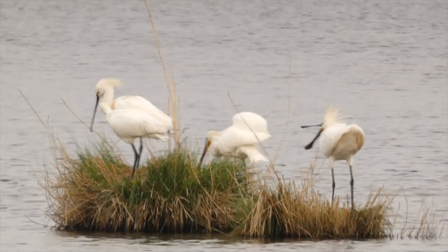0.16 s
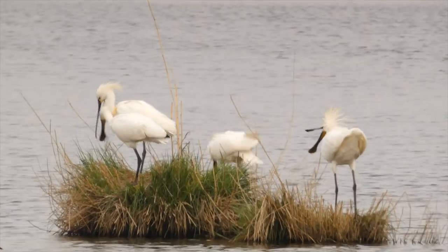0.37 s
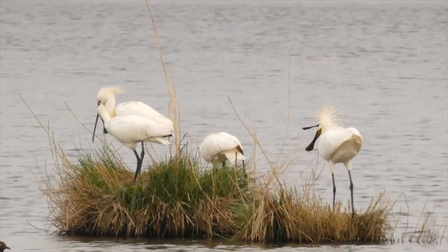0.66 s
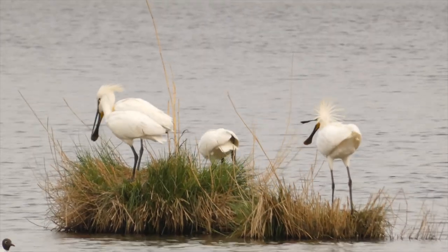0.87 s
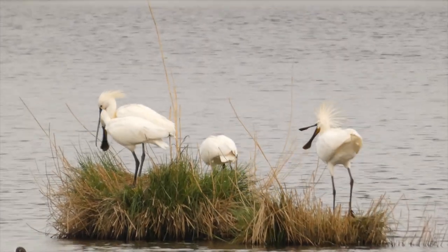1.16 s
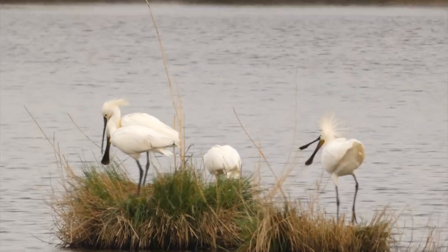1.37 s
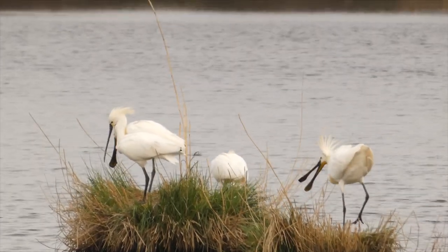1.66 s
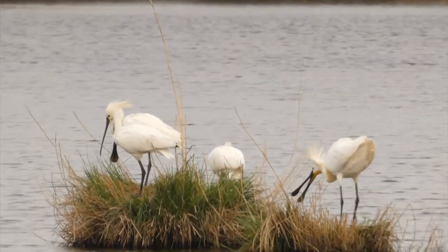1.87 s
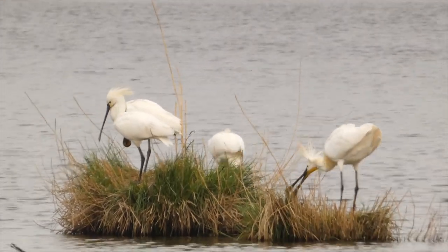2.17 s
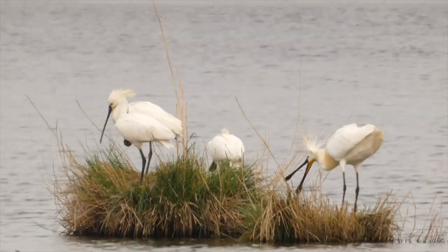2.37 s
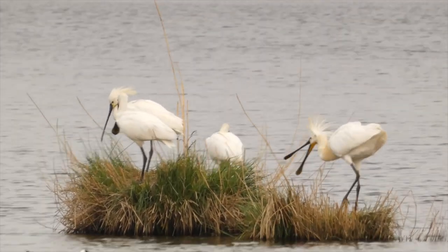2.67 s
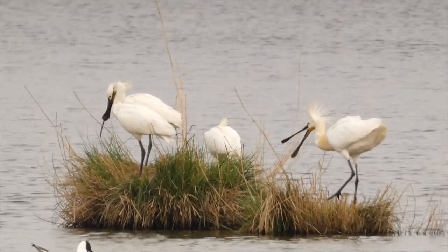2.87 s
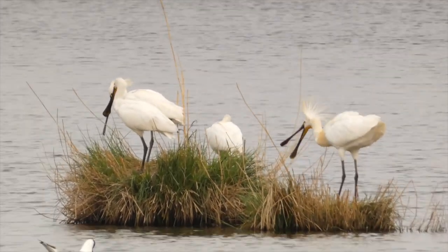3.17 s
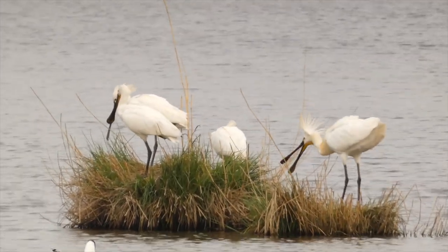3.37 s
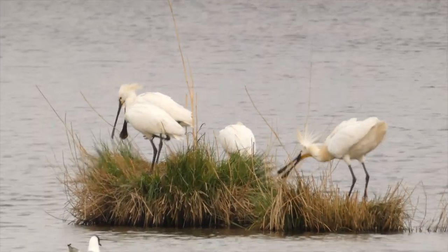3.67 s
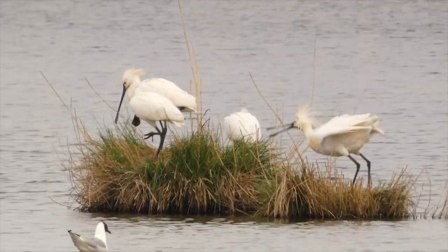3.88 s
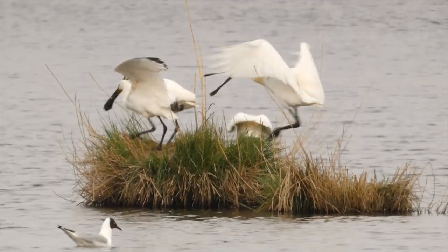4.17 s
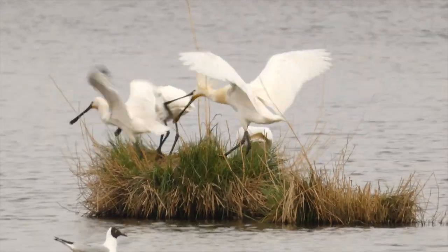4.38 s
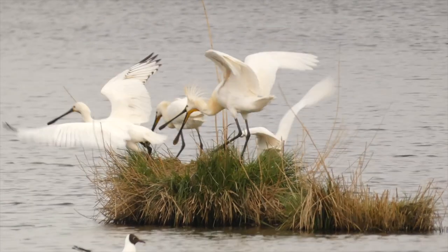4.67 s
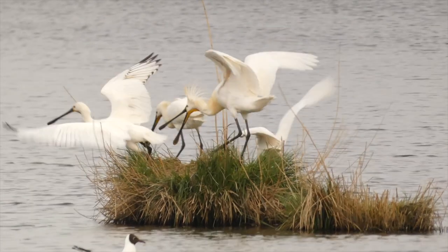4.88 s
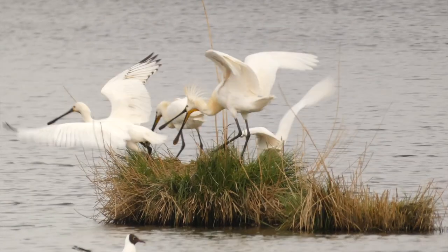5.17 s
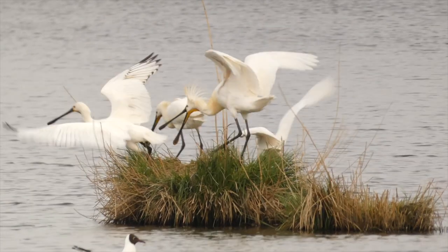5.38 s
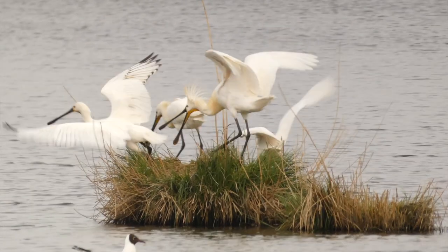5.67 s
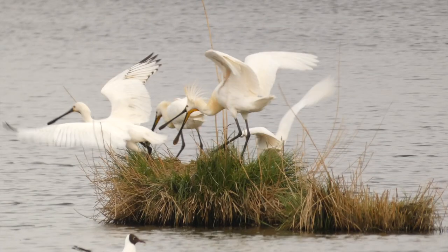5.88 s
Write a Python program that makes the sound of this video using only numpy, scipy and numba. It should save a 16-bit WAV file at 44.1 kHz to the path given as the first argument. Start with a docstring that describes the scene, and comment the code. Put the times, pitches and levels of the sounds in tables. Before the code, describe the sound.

Hoarse gull screams, squawks and sinking wails overlap outdoors by the water, with many more gulls chattering farther off. Wind bumps the nearly mono microphone in a few low thumps, mostly near the start. Later some birds trill, and a few very faint knocks and a tick come as the distant chorus eases. A faint low hum and hiss lie underneath.

```python
"""Gulls call across a pond: near birds rasp, yelp, wail and trill over the dense chorus of the colony.
Each voice is a reedy tone near 900 Hz, chopped into bursts and coloured by the throat.
Wind thumps now and then on an almost mono microphone, over a faint low hum and hiss.
The banks return a thin echo, and a few soft knocks and a tick come in the second half."""
import sys
import numpy as np
from scipy import signal
from scipy.fft import rfft, irfft, next_fast_len
from scipy.io import wavfile
from numba import njit

SR = 44100
rng = np.random.default_rng(int(sys.argv[2]) if len(sys.argv) > 2 else 0)


def file_out(sig):
    """Save sig as 16-bit WAV at sys.argv[1]."""
    # one column per channel
    cols = np.atleast_2d(sig).T
    # limit, then scale
    lim = np.clip(cols, -1, 1)
    pcm = np.round(lim * 32767).astype(np.int16)
    wavfile.write(sys.argv[1], SR, pcm)


N = 265482
CALL_T = np.arange(int(SR * .75)) / SR  # time within one call, t/s


def undb(db):
    """Decibels to gain."""
    return 10 ** (np.asarray(db) / 20)


def unit(x):
    """Scale to an rms of one."""
    return x / np.sqrt(np.mean(x ** 2) + 1e-20)


def curves(table):
    """Automation lanes: each column after the first, joined by straight lines in time."""
    times, *columns = np.transpose(table)
    return [np.interp(np.arange(N) / SR, times, column) for column in columns]


def colour(x, points):
    """EQ by a curve of f/Hz, level/dB; rms one."""
    hz, db = np.transpose(points)
    size = next_fast_len(x.shape[-1])
    bins_hz = np.maximum(np.arange(size // 2 + 1) * SR / size, 1)
    gain = undb(np.interp(np.log(bins_hz), np.log(hz), db))
    return unit(irfft(rfft(x, size) * gain, size)[..., :x.shape[-1]])


def waver(rate, t=CALL_T):
    """A random drift with rate turning points a second."""
    steps = rng.standard_normal(4096)
    return np.interp(t * rate, np.arange(len(steps)), steps)


def narrow_noise(size, side_db):
    """Noise that is nearly the same left and right."""
    mid, side = rng.standard_normal((2, size))
    return mid + undb(side_db) * side * np.array([[1], [-1]])


@njit
def swept_bandpass(x, hz, width_hz):
    """State-variable band-pass with a moving centre."""
    out, band_state, low_state = np.empty(len(x)), 0., 0.
    for i in range(len(x)):
        tuning, damping = np.tan(np.pi * hz[i] / SR), width_hz / hz[i]
        band = (band_state + tuning * (x[i] - low_state)) / (1 + tuning * (tuning + damping))
        band_state = 2 * band - band_state
        low_state += 2 * tuning * band
        out[i] = damping * band
    return out


def resonance(x, hz, width_hz):
    """Two band-passes in a row make a resonance with steep skirts; rms one."""
    hz, width_hz = hz * np.ones(len(x)), float(width_hz)
    return unit(swept_bandpass(swept_bandpass(x, hz, width_hz), hz, width_hz))


def add(out, start, x):
    """Mix a sound in at its start time."""
    offset = int(start * SR)
    first, last = max(offset, 0), min(offset + len(x), N)
    if last > first:
        out[first:last] += x[first - offset:last - offset]


def gesture(length, top_hz, end_hz, crest, edge_s):
    """Progress, pitch and loudness of a call: the pitch arches over a crest, the voice swells and stops."""
    progress = np.clip(CALL_T / length, 0, 1)
    pitch = top_hz + (end_hz - top_hz) * ((progress - crest) / (1 - crest)) ** 2
    fade = np.clip(np.minimum(CALL_T, length - CALL_T) / edge_s, 0, 1)
    return progress, pitch, np.sin(np.pi / 2 * fade)


def syrinx(pitch, burst_hz, jitter, hiss, bend, harmonics=13):
    """A reedy, jittering tone and the flutter that chops it; the pitch lifts within each burst."""
    cycle = rng.random() + np.cumsum(burst_hz * (1 + .021 * waver(58.6))) / SR
    flutter = np.sin(np.pi * cycle) ** 2
    phase = np.cumsum(pitch * (1 + jitter * waver(1200) + bend * (flutter - .75))) / SR
    angle = np.pi * (phase % 1) + 1e-9
    tone = np.sin((2 * harmonics + 1) * angle) / np.sin(angle) - 1  # a sum of equal harmonics
    return unit(tone) + hiss * rng.standard_normal(len(CALL_T)), flutter


def bursts(flutter, depth, uneven_db):
    """Loudness of the bursts, no two alike."""
    return unit((1 - depth + depth * flutter) * undb(uneven_db * waver(89.15)))


def burst_rate(pitch, top_hz):
    """Higher voices rattle faster, and the rattle slows as the pitch sinks."""
    usual_burst_hz, usual_pitch_hz, slowing = 86, 928.6, 1.74
    return usual_burst_hz * top_hz / usual_pitch_hz * (pitch / top_hz) ** slowing


def flock(count=90):
    """Many far birds, each with its own pitch, pace and hoarseness, merge into a chorus."""
    # their throats and the long way over the water: f/Hz, level/dB
    far_tone = [(400, -37), (700, -28), (1000, -11.5), (1250, 0), (1520, 8.5), (1850, 2.5), (2200, -0.5),
                (2600, -12), (3200, -13.5), (4200, -11.5), (4800, -17.5), (6000, -28), (7200, -42),
                (9500, -46.5), (14000, -62.5)]
    # swells and lulls: t/s, body level/dB, shrill edge level/dB
    swells = [(0.0, -46.5, -48), (0.35, -46, -47), (0.55, -47.5, -52), (0.8, -46.5, -47),
              (0.85, -50, -54.5), (0.98, -47.5, -49), (1.5, -45.5, -49), (1.8, -43.5, -47),
              (2.15, -44, -46.5), (2.4, -47, -49), (2.92, -48.5, -49), (3.28, -44.5, -48),
              (3.56, -51.5, -60), (3.63, -49, -47), (3.76, -49.5, -49), (4.43, -52.5, -48),
              (4.54, -56.5, -65.5), (4.63, -64, -60), (4.7, -55, -51), (4.77, -61.5, -55),
              (4.85, -55, -51.5), (5.6, -52.5, -52.5), (5.85, -52, -47), (6.02, -50.5, -50.5)]
    chorus = np.zeros(N)
    for k, (when, long, high, pace, hoarse, far) in enumerate(rng.random((count, 6))):
        top_hz = 800 + 300 * high
        progress, pitch, swell = gesture(.25 + .4 * long, top_hz, top_hz * .88, crest=.33, edge_s=.045)
        burst_hz = (70 + 25 * pace) * (1 - .18 * progress)
        source, flutter = syrinx(pitch, burst_hz, jitter=.05 + .04 * hoarse, hiss=.6, bend=.08)
        start = (k + when) / count * (N / SR + .5) - .5
        add(chorus, start, undb(-4 * far) * swell * bursts(flutter, depth=.65, uneven_db=1.5) * source)
    chorus = colour(chorus, far_tone)
    body = signal.sosfiltfilt(signal.butter(4, 2400, fs=SR, output="sos"), chorus)
    body_db, shrill_db = curves(swells)
    return undb(body_db) * unit(body) + undb(shrill_db) * unit(chorus - body)


def rasps():
    """Harsh falling screams: a strong second harmonic, and an upper resonance that sinks with the pitch."""
    # screams: start/s, end/s, top pitch/Hz, level/dB, then the upper resonance's f/Hz, width/Hz, level/dB
    screams = [ (-0.25, 0.423, 900.6, -52.5, 3730, 1310, -55.5), (0.223, 0.6, 907, -54, 6300, 2100, -64.5),
               (0.541, 0.839, 985, -50.5, 4560, 1010, -59.5), (0.887, 1.353, 885, -50, 4400, 1090, -55),
               (1.075, 1.51, 971, -50.5, 3920, 960, -55), (1.522, 2, 983, -45, 4380, 1010, -58.5),
               (1.529, 2.218, 878, -52, 4000, 950, -55.5), (1.956, 2.399, 985, -49.5, 4300, 990, -54.5),
               (2.39, 2.863, 836.6, -52, 5830, 500, -62), (2.438, 2.945, 928, -55, 3480, 840, -53),
               (2.929, 3.343, 920, -55, 3950, 960, -55.5), (2.918, 3.208, 912, -72, 7800, 1900, -73.5),
               (3.131, 3.356, 828, -49, 3640, 700, -62), (3.33, 3.593, 887, -54.5, 3570, 705, -63),
               (3.6, 4.231, 924, -52, 4110, 1060, -55), (4.04, 4.246, 895, -58, 3020, 800, -48.5),
               (4.279, 4.478, 887, -63, 2980, 900, -55), (4.542, 4.772, 977, -57.5, 4730, 970, -54.5),
               (4.793, 5.109, 945, -60, 4600, 805, -61), (4.899, 5.524, 961, -63, 2500, 580, -54.5),
               (5.449, 5.76, 939, -59.5, 3370, 810, -52), (5.73, 6.094, 933, -49.5, 3300, 890, -48)]
    # the throat's overtone envelope: f/Hz, level/dB
    throat = [(500, -6.5), (1000, 3), (1400, -20), (2000, 12.5), (2700, 9), (3600, -2), (4700, -28),
              (6000, -51), (7200, -10), (8600, -2), (10500, -34), (14000, -37)]
    sag_hz_per_s = 170  # a longer scream sinks further
    out = np.zeros(N)
    for start, end, top_hz, db, upper_hz, upper_width_hz, upper_db in screams:
        length = end - start
        _, pitch, swell = gesture(length, top_hz, top_hz - sag_hz_per_s * length, crest=.25, edge_s=.039)
        source, flutter = syrinx(pitch, burst_rate(pitch, top_hz), jitter=.03, hiss=.35, bend=.04)
        body = resonance(source, 2 * pitch, width_hz=720)
        hoarse = source + undb(2.5) * rng.standard_normal(len(CALL_T))  # harmonics break into air
        # the upper resonance chirps up and down within each burst and weakens between them
        chirp = 1 + .09 * (flutter - .75)
        upper = resonance(hoarse, upper_hz * chirp * pitch / top_hz, upper_width_hz)
        upper *= bursts(flutter, depth=.17, uneven_db=1)
        overtones = undb(-14.5) * colour(hoarse, throat)
        voice = undb(db) * (body + overtones) + undb(upper_db) * upper
        add(out, start, swell * bursts(flutter, depth=.69, uneven_db=2.5) * voice)
    return out


def yelps():
    """Short notes with one strong harmonic; a wide-open, rough throat turns them into squawks."""
    # notes: start/s, end/s, pitch/Hz, level/dB, throat f/Hz, throat width/Hz, jitter/share of pitch
    notes = [ (-0.04, 0.102, 756, -50, 1460, 200, 0.1), (0.461, 0.53, 866, -49.5, 3490, 199, 0.1),
             (0.54, 0.656, 857, -50, 3430, 200, 0.03), (0.688, 0.72, 980, -53, 4000, 300, 0.02),
             (0.684, 0.73, 830, -46.5, 3280, 400, 0.13), (1.107, 1.274, 737, -49.5, 1510, 200, 0.05),
             (1.165, 1.207, 1027, -40.5, 2050, 200, 0.12), (1.351, 1.438, 849, -46, 1710, 200, 0.02),
             (1.42, 1.485, 935, -43, 1880, 200, 0.09), (1.79, 1.888, 992, -47, 3030, 600, 0.06),
             (1.796, 1.83, 877, -52, 3560, 400, 0), (2.727, 2.804, 978, -48, 2930, 450, 0.06),
             (2.771, 2.827, 768, -53, 2360, 400, 0.02), (4.652, 4.72, 1024, -61, 3080, 200, 0.02),
             (4.96, 5.073, 945, -52, 1890, 250, 0.18), (5.028, 5.062, 850, -50, 2500, 300, 0.1),
             (5.113, 5.15, 845, -60, 2550, 300, 0.04), (5.211, 5.336, 727, -53.5, 1430, 200, 0),
             (5.281, 5.309, 985, -49, 2960, 250, 0), (5.495, 5.53, 1030, -56, 4140, 200, 0.07)]
    out = np.zeros(N)
    for start, end, top_hz, db, throat_hz, throat_width_hz, jitter in notes:
        _, pitch, swell = gesture(end - start, top_hz, top_hz * .975, crest=.491, edge_s=.013)
        source, flutter = syrinx(pitch, burst_hz=99.9, jitter=jitter, hiss=.1, bend=.019)
        voice = undb(db) * resonance(source, throat_hz, throat_width_hz)
        add(out, start, swell * bursts(flutter, depth=.42, uneven_db=2.5) * voice)
    return out


def wails():
    """Purring tones that sink from the first moment, clear in the second harmonic and hoarser above it."""
    # cries: start/s, end/s, first pitch/Hz, last pitch/Hz, jitter/share of pitch, harmonics 2-4 level/dB
    cries = [ (0.0, 0.235, 921, 887, 0.02, -52, -57, -49), (0.12, 0.421, 818, 795, 0.04, -49, -62, -64),
             (0.28, 0.562, 960, 824, 0.03, -48, -61, -57), (0.578, 0.858, 869, 857, 0.01, -48.5, -67, -58),
             (0.926, 1.205, 912, 861, 0.08, -44.5, -70, -52.5), (0.96, 1.1, 805, 781, 0.06, -45, -56, -62),
             (1.037, 1.222, 1185, 1040, 0.05, -51, -55, -54),
             (1.216, 1.421, 1161, 991, 0.02, -51, -53, -58), (1.218, 1.501, 981, 847, 0.13, -46, -58, -63),
             (1.559, 1.928, 1160, 1126, .03, -52, -68, -61), (1.683, 1.991, 956, 920, 0.01, -55, -59, -55),
             (1.777, 1.941, 840, 751, 0.08, -49, -65, -57), (2.021, 2.215, 808, 754, 0.07, -48, -63, -66),
             (2.214, 2.571, 975, 792, 0.06, -43, -57.5, -60),
             (2.579, 2.782, 850, 779, 0.08, -45.5, -64, -64),
             (2.97, 3.176, 1145, 1124, 0.02, -50, -51, -57),
             (3.056, 3.265, 925, 869, 0.03, -42.5, -66, -59),
             (3.358, 3.582, 935, 832, 0.03, -50, -71, -58.5), (3.63, 3.99, 1178, 1145, 0.02, -53, -59, -69),
             (4.422, 4.584, 881, 820, 0.06, -53.5, -63, -68), (5.71, 5.999, 949, 923, 0.03, -49, -52, -62)]
    out = np.zeros(N)
    for start, end, top_hz, end_hz, jitter, second_db, third_db, fourth_db in cries:
        progress, _, swell = gesture(end - start, top_hz, end_hz, crest=0, edge_s=.05)
        pitch = top_hz + (end_hz - top_hz) * progress ** 1.5
        source, flutter = syrinx(pitch, burst_rate(pitch, top_hz), jitter, hiss=.3, bend=.025)
        voice = (undb(second_db) * resonance(source, 2 * pitch, width_hz=290)
                 + undb(third_db) * resonance(source, 3 * pitch, width_hz=700)
                 + undb(fourth_db) * resonance(source, 4 * pitch, width_hz=960))
        add(out, start, swell * bursts(flutter, depth=.72, uneven_db=1.5) * voice)
    return out


def bank_echo(birds, t60_s, db):
    """A thin, diffuse echo from the reeds and banks."""
    tail = narrow_noise(len(CALL_T), side_db=-58) * undb(-60 * CALL_T / t60_s)
    tail /= np.sqrt(np.sum(tail[0] ** 2))
    return undb(db) * signal.fftconvolve(birds[None], tail)[:, :N]


def open_air():
    """A wavering bed of air with a low hum in it."""
    # still air, its hum near 400 Hz: f/Hz, level/dB
    air_tone = [(30, -39), (120, -32), (300, -18), (360, -0.5), (405, 10), (470, -4.5), (650, -9.5),
                (1000, -11.5), (3000, -4), (9000, -45), (14000, -36)]
    # fader ride of the air: t/s, level/dB
    air_ride = [(0.0, -63), (0.82, -68.5), (1.05, -75), (1.45, -64.5), (3.2, -63.5), (3.65, -62.5),
                (4.48, -62), (4.6, -70), (4.95, -73), (5.9, -63)]
    (air_db,) = curves(air_ride)
    waver_db = 2 * waver(11, np.arange(N) / SR)
    return undb(air_db + waver_db) * colour(narrow_noise(N, side_db=-36), air_tone)


def wide_hiss():
    """A faint, steady hiss, independent in each ear."""
    # f/Hz, level/dB
    tone = [(40, 5), (130, -2), (400, 14), (1500, 4.5), (5000, -14.5), (9000, 2.5), (14000, -7)]
    return undb(-78.5) * colour(rng.standard_normal((2, N)), tone)


def wind():
    """Eddies buffet the microphone: each builds up and collapses, over a light breeze."""
    # the breeze between the thumps: t/s, rumble level/dB
    breeze = [(0.0, -79.5), (0.65, -76.5), (1.05, -65), (1.6, -72), (2.6, -74.5), (3.3, -79.5), (4.1, -80),
              (5.0, -85), (6.02, -94)]
    # thumps: peak t/s, length/s, rumble level/dB, flutter level/dB
    gusts = [ (0.72, 0.026, -43, -62), (0.779, 0.022, -41, -53), (0.823, 0.046, -38.5, -39),
             (0.88, 0.043, -56, -46), (0.95, 0.086, -51, -56), (1.105, 0.044, -42.5, -73),
             (1.153, 0.045, -50, -58), (1.192, 0.018, -43, -57), (1.23, 0.028, -40.5, -37.5),
             (1.285, 0.023, -47.5, -67), (2.023, 0.057, -63, -85), (2.2, 0.091, -59.5, -87),
             (2.363, 0.099, -55, -69), (2.424, 0.036, -45, -54), (2.693, 0.077, -61, -77),
             (2.797, 0.1, -50, -56), (2.876, 0.078, -53, -45), (3.607, 0.085, -76, -70),
             (3.77, 0.047, -58, -56.5), (4.495, 0.057, -55.5, -62.5), (4.536, 0.09, -64, -56.5),
             (4.698, 0.16, -82, -59.5), (4.923, 0.01, -66, -59), (5.166, 0.086, -66, -65),
             (5.368, 0.11, -78, -60.5), (5.546, 0.054, -88, -66.5)]
    # the deep rumble of an eddy: f/Hz, level/dB
    rumble_tone = [(25, -38), (50, -20), (80, -2.5), (120, 1.5), (160, -2.5), (220, -25.5), (500, -71)]
    # the flutter above it: f/Hz, level/dB
    flutter_tone = [(70, -34), (125, -5), (180, 3), (230, -4), (310, -15.5), (500, -34.5), (800, -42),
                    (2000, -76)]
    rise, fall = .37, .48  # time constants, as shares of a thump's length
    t = np.arange(N) / SR
    (breeze_db,) = curves(breeze)
    rumble_gain, flutter_gain = undb(breeze_db), undb(breeze_db - 3.5)
    for peak_s, length, rumble_db, flutter_db in gusts:
        push = np.exp(-np.maximum((peak_s - t) / rise, (t - peak_s) / fall) / length)
        rumble_gain = np.hypot(rumble_gain, undb(rumble_db) * push)
        flutter_gain = np.hypot(flutter_gain, undb(flutter_db) * push)
    rumble = rumble_gain * colour(narrow_noise(N, side_db=-26), rumble_tone)
    flutter = flutter_gain * colour(narrow_noise(N, side_db=-25.5), flutter_tone)
    # the microphone does not follow the slowest swings
    return signal.sosfilt(signal.butter(3, 48, "high", fs=SR, output="sos"), rumble + flutter)


def trills():
    """Harmonic calls that arch and sink away, cut by short gaps at about half the rate of a rasp."""
    # arches: start/s, end/s, crest/s, top pitch/Hz, last pitch/Hz, jitter/share of pitch,
    # in-between tones relative to the harmonics/dB, harmonics 2-6 level/dB
    arches = [ (2.635, 2.863, 2.73, 990, 945, 0, -9, -56, -58, -77, -78, -70),
              (3.223, 3.572, 3.315, 989, 819, 0, -22, -48, -56.5, -71, -58.5, -69),
              (3.726, 3.985, 3.85, 1011, 915, 0, -15, -47.5, -52.5, -72, -55, -65.5),
              (4.24, 4.51, 4.36, 973, 873, 0, -6.5, -53.5, -52, -51.5, -64, -59),
              (4.781, 4.935, 4.863, 933, 900, 0, -23, -61, -64, -52, -59, -65),
              (5.273, 5.417, 5.353, 923, 888, 0.03, -16, -74, -57, -49.5, -57, -64.5),
              (5.819, 5.975, 5.89, 942, 891, 0.02, -11, -47, -63, -47.5, -66, -62)]
    # roll-off of harmonics 7-10: level/dB relative to the sixth
    roll_off = (-19, -24, -27, -32)
    burst_hz, fade_db, dulling_db = 44.3, 1.2, .8
    out = np.zeros(N)
    for start, end, crest_s, top_hz, end_hz, jitter, between_db, *harmonics_db in arches:
        length = end - start
        _, pitch, swell = gesture(length, top_hz, end_hz, crest=(crest_s - start) / length, edge_s=.035)
        cycle = np.cumsum(burst_hz * (1 + .03 * waver(58))) / SR
        flutter = np.sin(np.pi * cycle) ** 2
        wobble = 1 + jitter * waver(1200) + .003 * waver(60) + .014 * (flutter - .75)
        phase = 2 * np.pi * np.cumsum(pitch * wobble) / SR
        semitones_down = 12 * np.log2(top_hz / pitch)
        levels_db = [*harmonics_db, *(harmonics_db[-1] + np.array(roll_off))]
        voice = 0
        # strong and weak cycles alternate, which puts tones halfway between the harmonics
        for k in np.arange(2, 10.5, .5):
            db = np.interp(k - 2, np.arange(len(levels_db)), levels_db) + (between_db if k % 1 else 0)
            # away from its crest the call weakens, the higher harmonics first
            loss_db = fade_db * semitones_down + dulling_db * (k - 2) * semitones_down ** 2
            gain = np.sqrt(2) * undb(db - loss_db + 1.8 * waver(70))
            voice += gain * np.sin(k * phase + 2 * np.pi * rng.random())
        loudness = np.sqrt(signal.fftconvolve(voice ** 2, np.ones(512) / 512, "same") + 1e-14)
        breath = undb(-9) * loudness * resonance(rng.standard_normal(len(CALL_T)), hz=3140, width_hz=920)
        chop = bursts(np.tanh(1.5 * flutter), depth=.97, uneven_db=1.8)
        add(out, start, swell * chop * (voice + breath))
    return out


def knocks():
    """Faint, dry knocks and a tick close to the microphone: bands of noise that die away fast."""
    # hits: t/s, f/Hz, width/Hz, level/dB, decay/s
    hits = [(3.535, 650, 250, -68, 0.051), (4.544, 378, 285, -52, 0.022), (4.74, 384, 394, -60, 0.0095),
            (4.86, 10300, 7000, -70, 0.017)]
    out = np.zeros(N)
    for start, hz, width_hz, db, decay_s in hits:
        band = resonance(rng.standard_normal(len(CALL_T)), hz, width_hz)
        add(out, start, undb(db) * np.exp(-CALL_T / decay_s) * band)
    return out


def scene():
    """All birds sit in the centre and feed the echo; wind, air, knocks and hiss stay dry."""
    birds = rasps() + wails() + trills() + yelps() + flock()
    echo = bank_echo(birds, t60_s=.35, db=-17)
    return birds + echo + wide_hiss() + wind() + open_air() + knocks()


def record(dry):
    """A steep low-pass takes off the very top."""
    top_hz = 14300
    return signal.sosfilt(signal.ellip(8, .2, 70, top_hz, fs=SR, output="sos"), dry)


dry = scene()
out = record(dry)
file_out(out)
```